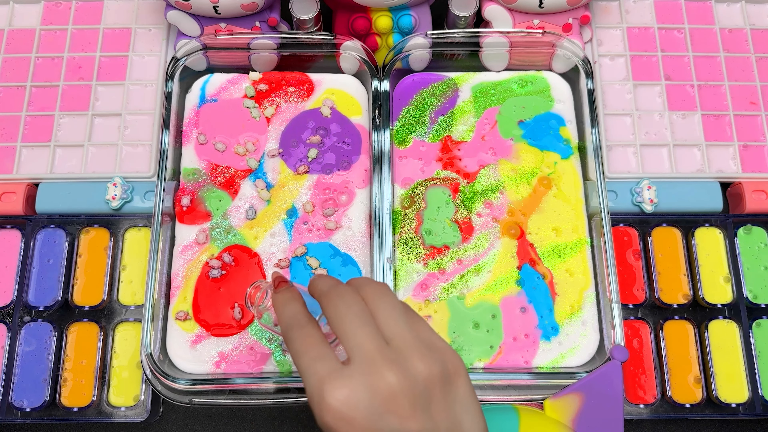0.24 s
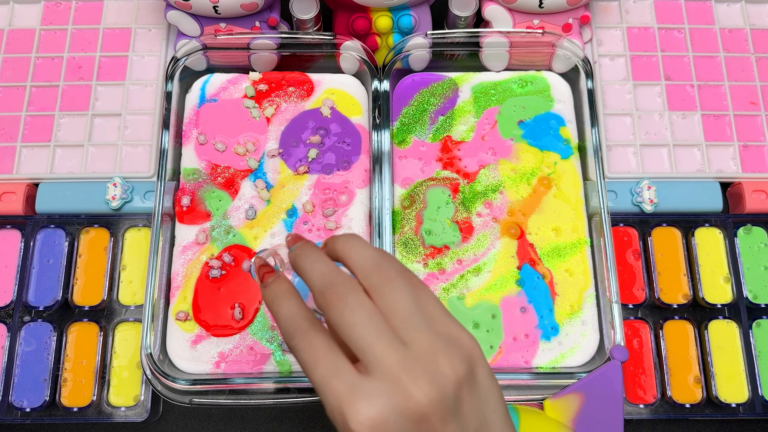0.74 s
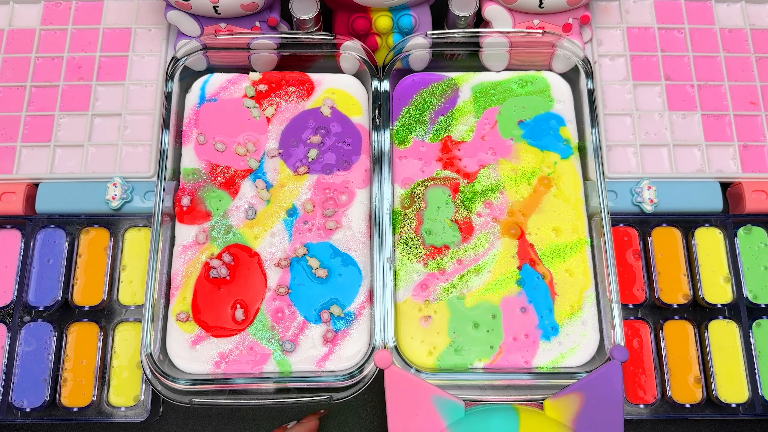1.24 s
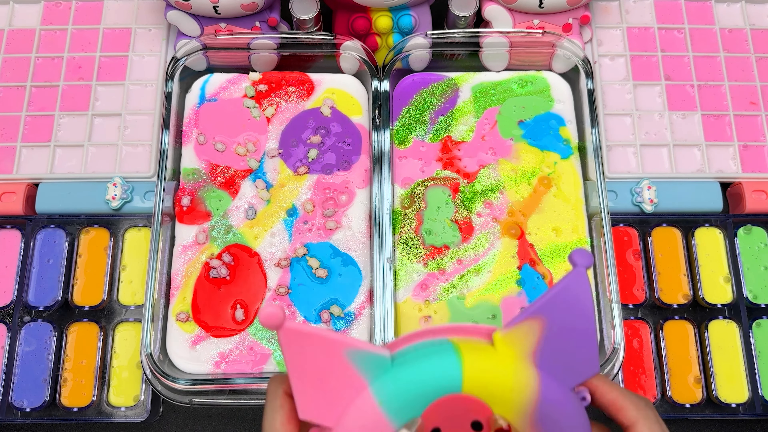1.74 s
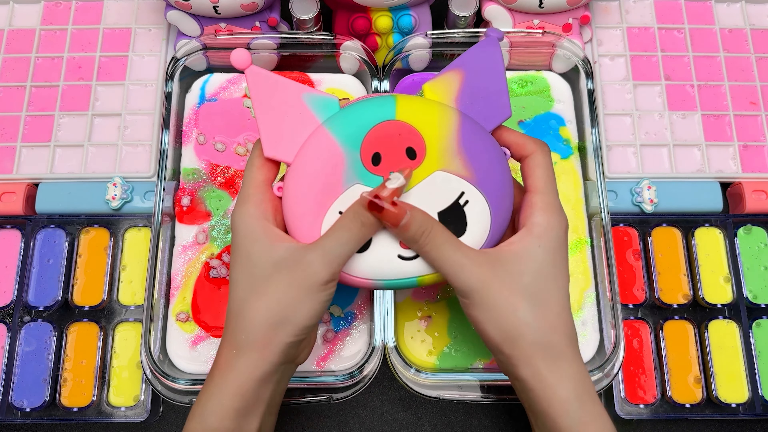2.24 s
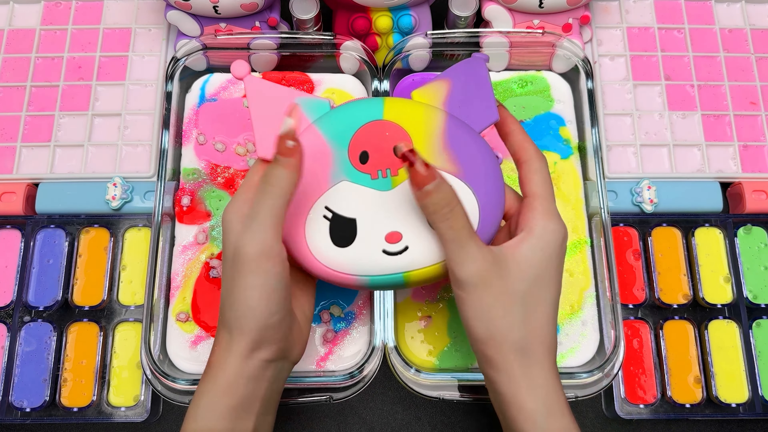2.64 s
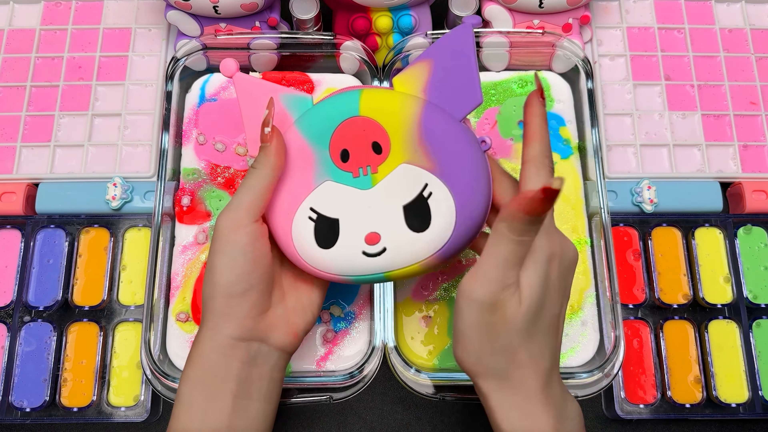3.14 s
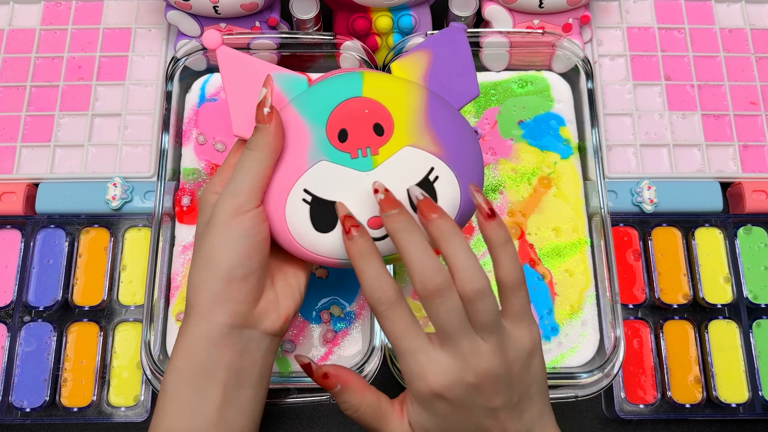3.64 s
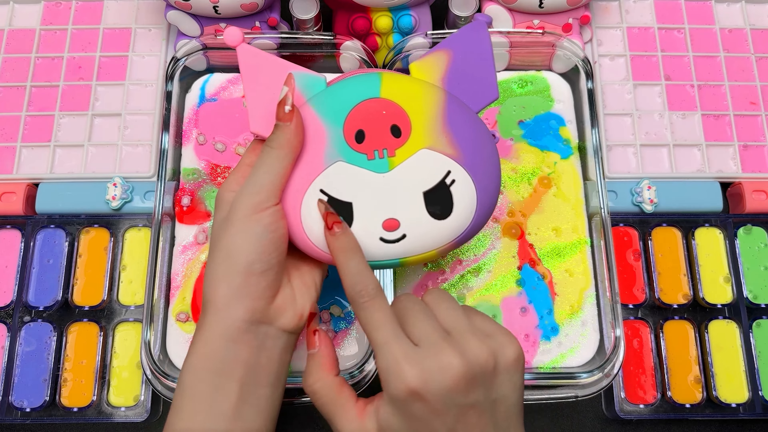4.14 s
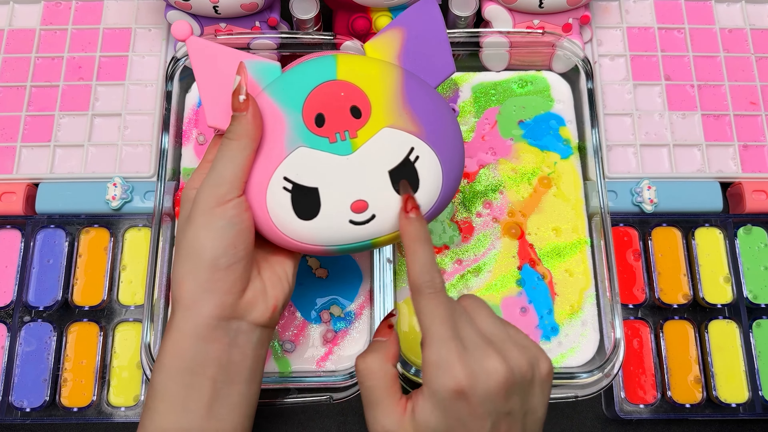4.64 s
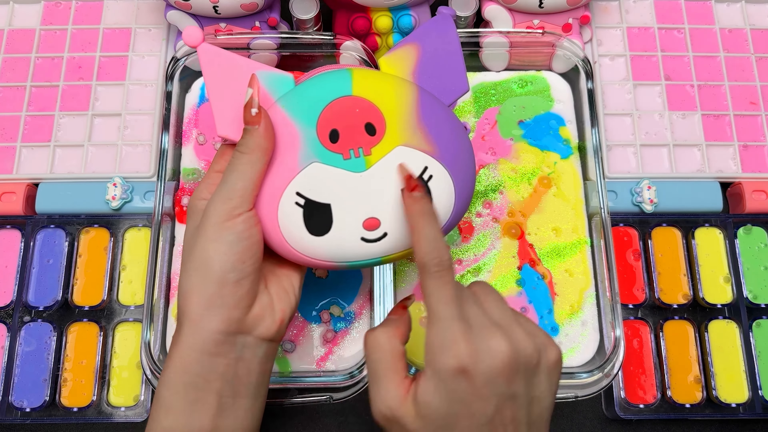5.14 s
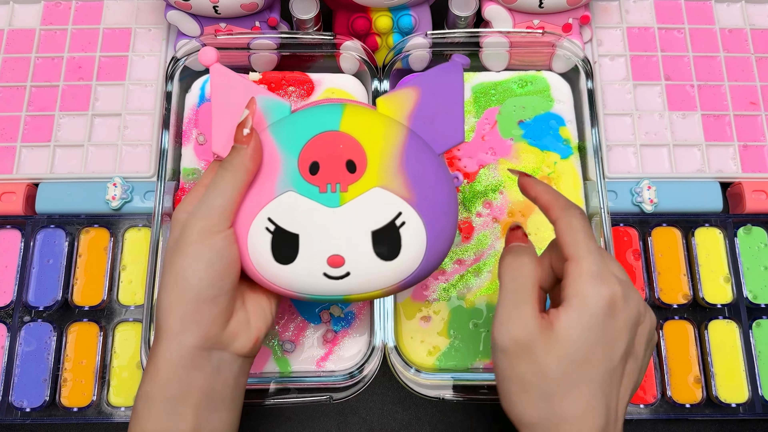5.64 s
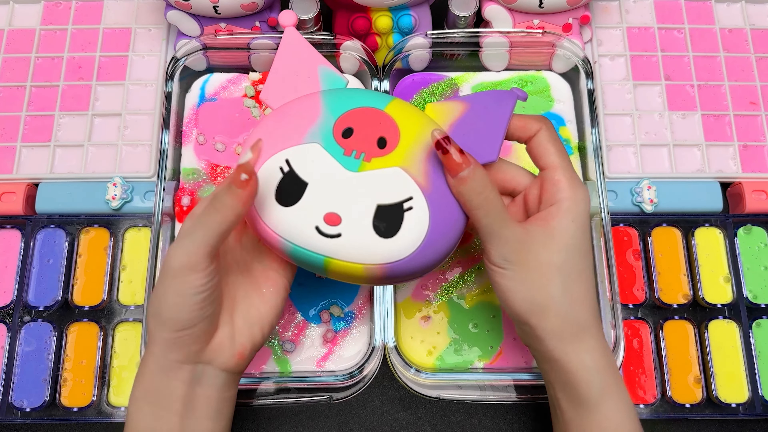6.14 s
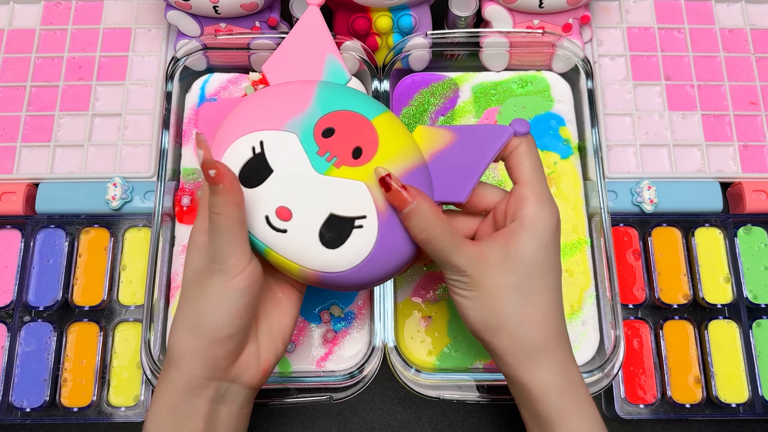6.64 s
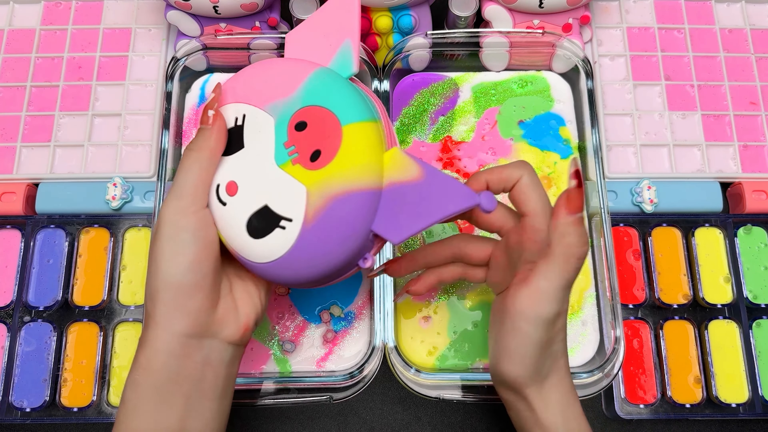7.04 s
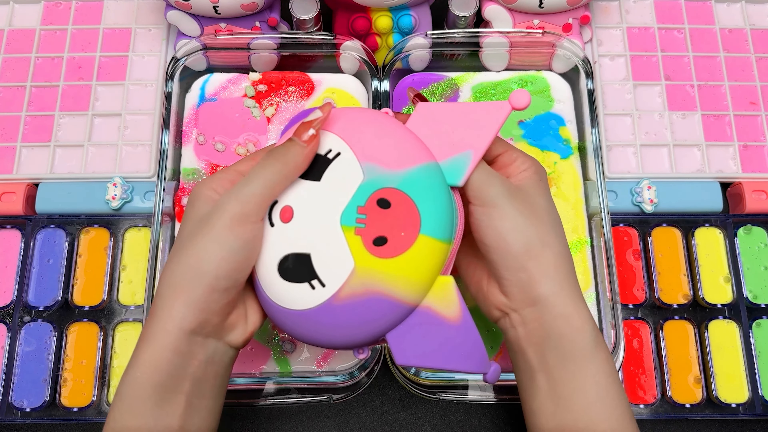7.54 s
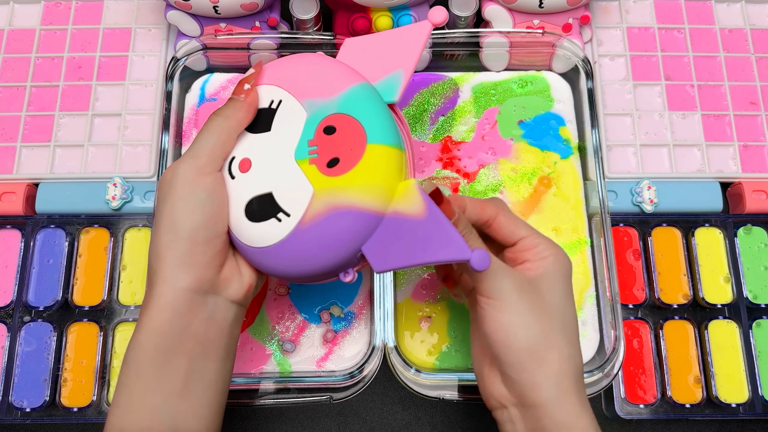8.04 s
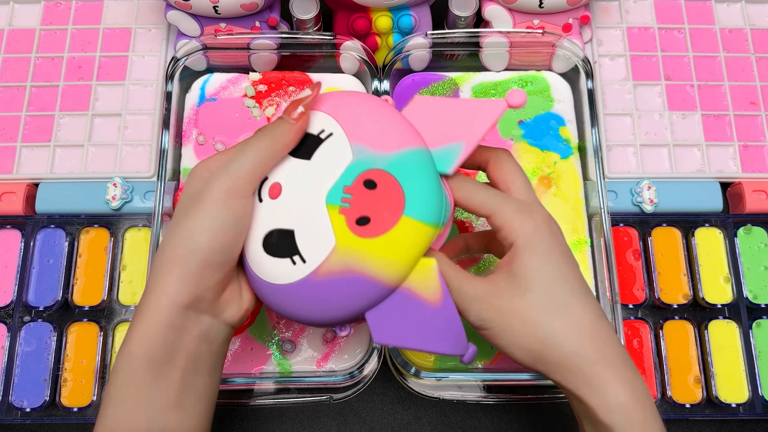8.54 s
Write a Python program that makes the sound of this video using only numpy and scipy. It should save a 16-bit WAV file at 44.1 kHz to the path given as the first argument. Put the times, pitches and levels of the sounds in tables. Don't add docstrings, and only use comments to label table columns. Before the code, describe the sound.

Very close in a small quiet room, tiny beads clatter in a glass vial for half a second, then the vial lands on a tray. After a brief total silence, hands squeeze, drum and poke a hollow silicone purse: soft pops, slaps, dry rubbing. Three rubbery stick-slip squeaks follow, then clicks, a short rasping zip, a tiny metal jingle and more handling.

```python
import sys
import numpy as np
from scipy import signal
from scipy.fft import rfft, irfft
from scipy.io import wavfile
from scipy.ndimage import uniform_filter1d

SR = 44100
rng = np.random.default_rng(int(sys.argv[2]) if len(sys.argv) > 2 else 0)


def materialize(psi):
    bounded = np.clip(np.atleast_2d(psi).T, -1, 1)
    quanta = np.round(bounded * 32767).astype(np.int16)
    wavfile.write(sys.argv[1], SR, quanta)


def nominal_scale(level):
    x = np.asarray(level, float) / 20
    return 10 ** x


N = 387638
T = np.arange(N) / SR

CUT = (1.298, 1.826)
# frequency in Hz, level in dB per Hz.
ROOM = [(18, -59), (30, -19.5), (70, -9), (95, -25.5), (204, -12), (666, -26), (9460, -34.5),
        (16000, -26.5)]
ROOM_DB = [-65.5, -59]
# frequency in Hz, level in dB.
HUM = [(199.2, -80), (9415, -88)]
# start in seconds, fade in seconds, level in dB, centre in Hz, width in Hz.
GRAZES = [(.002, 0.035, -54, 4400, 2020), (.815, 0.043, -34.5, 1310, 130), (.82, 0.036, -44.5, 2200, 500),
          (0.818, .035, -33.5, 5140, 2500), (1.831, .1, -54, 1720, 305), (2.87, .06, -41, 3540, 900),
          (2.97, 0.036, -44.5, 11100, 1800), (3.099, 0.01, -41, 2500, 1200),
          (5.669, 0.031, -55, 2300, 1200), (7.28, .045, -43, 1520, 1620), (7.29, .045, -44, 5070, 3000),
          (2.62, .012, -33.5, 1182, 900), (7.512, .02, -56, 3630, 500), (7.555, 0.021, -46.5, 1800, 700),
          (7.92, 0.043, -17, 1427, 200), (8.001, 0.025, -28, 2970, 300), (8.42, 0.026, -27.5, 2290, 302),
          (8.481, 0.057, -31, 3280, 2200)]
# time in seconds, body level in dB, latch level in dB.
SNAPS = [
    (7.277, -25.5, -37),
    (7.283, -30, -40),
    (7.2881, -15, -30.5),
    (7.2951, -20.5, -22.5),
    (7.3123, -17, -20.5),
    (7.317, -24.5, -28),
    (7.328, -20.5, -19),
]
# mode in Hz, width in Hz, level in dB.
SLIDER = [(1390, 280, 0), (1800, 230, 2.5), (3380, 170, -1), (3795, 50, -10), (4830, 300, -6)]
# mode in Hz, width in Hz, level in dB.
LATCH = [(6220, 200, -2.5), (7000, 570, -1), (9870, 400, -4.5), (12030, 640, 1.5)]

# time in seconds, blow in dB, wall ring in dB re blow.
CLUSTERS = [(0.057, -34, 2), (0.078, -24, -16.5), (0.0907, -21, -11), (0.113, -8.5, -18.5),
            (0.1213, -17.5, 0.5), (0.129, -3.5, -27), (0.1355, -0.5, -11), (0.142, 0.5, -1.5),
            (0.153, -7.5, -24), (0.218, -2, -2.5), (0.227, 1, -14.5), (0.2493, 0, -10.5), (0.2569, 8, -16),
            (0.2732, -1, 1), (0.2836, 2.5, -4.5), (0.2935, -10, -10.5), (0.3558, -15.5, -5),
            (0.38, -6.5, -11), (0.39, 4.5, -5.5), (0.406, -7, -16.5), (0.4206, 0, -23.5), (0.4802, -1, -6),
            (0.5331, 2, 0), (0.5542, -2.5, -0.5), (0.5831, -11, -20), (0.607, -12, -10),
            (0.635, -17, -23.5)]
# mode in Hz, width in Hz, level in dB.
CLACK = [(11330, 230, -1.5), (10340, 960, -6.5), (8700, 500, -14.5)]
# mode in Hz, width in Hz, level in dB.
WALL = [(14430, 100, 0), (14080, 150, -4), (12600, 200, -16)]
# mode in Hz, width in Hz, level in dB.
RATTLE = [(2330, 360, -7.5), (4120, 110, -4), (4540, 600, 6.5), (5500, 300, -4), (3280, 660, 1),
          (7700, 40, -17.5)]
RATTLE_DB, RATTLE_GROWTH = -17, .7
# time in seconds, level in dB, pitch in Hz.
BREATHS = [
    (.132, -30.5, 789),
    (.228, -29, 850),
    (.252, -25.5, 800),
    (.288, -36.5, 847),
    (.392, -27.5, 809),
    (.536, -26, 828),
    (.555, -26.5, 833),
]
AIR_CYCLES, AIR_SWELL = 9, 3.
# mode in Hz, width in Hz, level in dB.
AIR = [(842, 70, 0)]
AIR_DB = -58
# time in seconds, blow in dB.
SET_DOWN = [
    (0.804, -1),
    (0.804, -4.5),
    (0.8121, -0.5),
]
# mode in Hz, width in Hz, level in dB.
TRAY = [(1300, 41, -20.5), (1395, 60, -24), (1890, 370, -9), (2780, 790, -8), (4600, 140, -13.5),
        (6100, 3600, 13.5), (11100, 3500, 3.5)]

# mode in Hz, width in Hz, level in dB.
HOLLOW = [(298, 48, 1.5), (434, 75, 9.5), (516.3, 54.5, 7.5), (598, 77, 14), (685, 47, -10.5)]
# mode in Hz, width in Hz, level in dB.
SKIN = [(840, 630, -1.5), (1408, 470, 4.5), (1707, 92, -8), (2200, 440, 3.5)]
# mode in Hz, width in Hz, level in dB.
RASP = [(3330, 1800, 1.5), (3640, 1200, -3.5), (4180, 1000, 2), (5230, 730, -7)]
# mode in Hz, width in Hz, level in dB.
RUB = [(2400, 490, -2), (3000, 440, 4.5)]
# mode in Hz, width in Hz, level in dB.
HISS = [(7650, 6900, -2), (10700, 2600, -1.5), (14500, 3000, -12.5)]
# start in seconds, length in seconds, pressure in dB, dryness in dB.
SLIDES = [(1.812, 0.2, -62, -2.5), (2.216, 0.11, -32.5, 1.5), (2.336, .11, -46, 5),
          (2.449, 0.11, -40.5, -10.5), (2.737, .11, -36, 0), (2.821, 0.14, -57, 14),
          (2.957, 0.081, -39, -9), (3.077, 0.13, -43.5, -22), (3.332, 0.062, -32.5, -15.5),
          (3.428, 0.093, -39, -8.5), (5.377, 0.11, -39.5, 0.5), (5.665, 0.049, -35.5, -31.5),
          (5.775, 0.13, -33.5, -9.5)]
# start in seconds, length in seconds, pressure in dB, dryness in dB.
STROKES = [
    (4.123, 0.11, -45, -15.5),
    (4.257, 0.083, -33, -15.5),
    (4.471, 0.11, -49, -29),
    (4.599, 0.051, -34.5, -10),
    (4.781, 0.028, -28, -36),
    (4.863, 0.14, -38, -16.5),
    (5.04, 0.087, -34, -23),
    (5.238, 0.062, -44.5, -5.5),
]
# start in seconds, length in seconds, pressure in dB, dryness in dB.
KNEADS = [(6.097, 0.064, -36, -12), (6.17, 0.056, -37, -15), (6.503, 0.17, -38.5, -7.5),
          (7.03, 0.059, -48.5, -50), (7.546, 0.053, -28.5, -62), (8.164, 0.096, -38, -7),
          (8.253, 0.097, -38, -1), (8.36, 0.072, -44.5, -4), (8.411, 0.093, -32, -16.5),
          (8.487, 0.106, -27, -11), (8.646, 0.1, -35, -20.5)]
# skin in dB, hiss in dB.
FINISH = [
    (0, -2.5),
    (7, -5),
    (2, -29.5),
]
SKIN_PER_DRYNESS = 0.5
RUB_DB, RUB_PER_DRYNESS = 1.5, 0.98

# time in seconds, slap in dB, hollow pop and nail in
# dB re slap.
TAPS = [(2.185, -16.5, -4, -50.5), (2.213, -32.5, 14.5, 21), (2.273, 2, -1, -18),
        (2.302, -25.5, 16, -13), (2.378, 1.5, -0.5, -10.5), (2.497, -20, 8, -11.5),
        (2.736, -13.5, -7, 11.5), (2.758, -21.5, -34, 5.5), (2.767, -26.5, 14.5, -8.5),
        (2.817, -10.5, -6.5, -25), (2.966, -23.5, 14, -4), (3.022, -19, 8.5, -43), (3.104, -13, 4, -59),
        (3.17, -35.5, 11.5, -26), (3.339, 2.5, 5, -22), (3.444, -12, 15, -0.5), (3.507, -2.5, 5.5, -48),
        (3.591, -2, 2.5, -29), (3.653, -2, 10.5, -43), (3.749, -33, 17, -56),
        (4.049, -32.5, 10, -66), (4.199, -5, -2.5, -82), (4.261, -1, -3.5, -41), (4.281, -10.5, 15.5, -7),
         (4.337, -16.5, 14.5, -32), (4.512, -31.5, 19.5, -72), (4.607, -5.5, -10, -44), (4.614, -18, 6, 12),
         (4.678, -3, -12, -42), (4.69, -13, 8, -16), (4.86, -16.5, -4, -28), (4.89, -7, -7, -23),
         (4.954, -19, 10, -37), (5.039, -26.5, 16.5, -67.5), (5.105, -8, 2.5, -83),
         (5.277, -39.5, -18, 11.5), (5.42, -20, -4, -33), (5.455, -7, 7.5, -12.5),
        (5.681, -29, 17.5, -14), (5.774, -18, 22, 16), (5.806, -24.5, 13.5, 11.5), (5.837, -13, -6, -12.5),
         (5.854, -15.5, 3, -9), (6.104, -23, 8, -34), (6.175, -15.5, 4.5, -34), (6.265, -12, 3.5, -16.5),
         (6.513, -8, 11, -3), (6.748, -8, 9, -4), (6.771, -2.5, 12, -12), (8.198, -14.5, -33, -23),
         (8.233, -20, -31, -21), (8.283, -16, -47, -14), (8.568, -12, 2.5, -29.5), (8.681, -19, -5, -16.5)]
# time in seconds, level in dB.
THUMPS = [(2.256, -25.5), (2.369, -22), (2.486, -26.5), (2.75, -14), (2.8, -19), (2.968, -18),
          (3.333, -11.5), (3.433, -11.5), (3.503, -13.5), (3.582, -15.5), (3.649, -17.5), (3.745, -17),
          (5.375, -29), (5.44, -23), (5.672, -18), (5.762, -14.5), (6.093, -27.5), (6.541, -20.5),
          (6.828, -24.5), (8.476, -25), (8.549, -24.5)]
# mode in Hz, width in Hz, level in dB.
THUD = [(66, 170, -4.5), (120, 40, 3.5), (169, 26, 17.5), (209, 12, 9.5)]
# mode in Hz, width in Hz, level in dB.
NAIL = [(9170, 3200, 18), (11340, 360, 9.5), (14500, 4200, -17)]
# time in seconds,
# level in dB, pitch in Hz.
POPS = [(2.219, -14.5, 348), (2.272, -17, 443), (2.378, -10.5, 584), (2.816, -15.5, 306),
        (3.104, -12.5, 308), (3.346, -5.5, 296), (3.443, 3, 374), (3.507, -17.5, 510), (3.526, -4, 562),
        (3.591, -8, 370), (3.651, -7.5, 315), (3.663, -12, 527), (3.669, -12.5, 251), (4.2, -8, 507),
        (4.26, -2, 630), (4.28, 1, 552), (4.337, -9, 592), (4.511, -14.5, 455), (4.609, -10.5, 640),
        (4.64, -10, 494), (4.679, -2.5, 421), (4.856, -15, 332), (4.96, -14.5, 600), (5.039, -11, 327),
        (5.105, -12.5, 603), (5.306, -17.5, 583), (5.417, -9, 317), (5.455, -1, 425), (5.462, -5.5, 304),
        (5.474, -13, 348), (5.678, -10.5, 465), (5.764, -15, 424), (5.775, -6, 416), (5.784, -16, 280),
        (5.836, -16, 660), (5.863, -13, 580),
        (6.177, -6, 738), (6.265, -9.5, 496), (6.513, -7, 416), (6.529, -7, 590), (6.748, -10, 440),
             (6.757, -10, 454), (6.771, -2, 433), (6.812, -6, 475), (6.825, 4, 613), (6.838, -6.5, 420),
             (7.317, -22, 385), (7.506, -37, 440), (7.554, -9.5, 400), (7.689, -21, 510), (8.181, -15, 660),
             (8.31, -12.5, 630), (8.332, -19.5, 246), (8.372, -17.5, 650), (8.425, -12.5, 610),
             (8.439, -12.5, 620), (8.464, -8.5, 570), (8.48, -14, 423), (8.487, -8, 414),
             (8.498, -5.5, 540), (8.509, -8, 587), (8.526, -12.5, 600), (8.545, -7, 640),
             (8.555, -8.5, 533), (8.567, -7, 462), (8.594, -14.5, 507), (8.609, -15, 570),
             (8.678, -10, 500), (8.694, -17, 538)]
# time in seconds, level in dB, pitch in Hz.
TICKS = [(2.378, -12, 2330), (3.1048, -13, 1040), (3.3417, 2, 1047), (3.4434, 4, 1000), (3.5074, -3, 1110),
         (3.5282, -6.5, 1510), (3.5926, -2, 1070), (3.6525, -5.5, 1100), (3.6695, -6, 1053),
         (4.2606, 0.5, 1340), (4.6754, -9.5, 1690), (4.8616, -12.5, 1226), (4.8929, -15.5, 1080),
         (5.0418, -14.5, 1310), (5.057, -19, 1216), (5.07, -14.5, 1200), (5.1063, -13.5, 1720),
         (5.244, -21, 1390), (5.4432, -18, 2410), (5.4546, -2, 2430), (5.7778, -11.5, 970),
         (5.8385, -8, 2200), (5.8544, -16, 2180), (6.1035, -14.5, 2730), (6.1743, -4.5, 3390),
         (8.184, -17, 3193), (8.1962, -10.5, 1620), (8.2655, -12, 1670), (8.2826, -4, 3060),
         (8.4394, -21, 2200), (8.4874, -11, 2140), (8.527, -9.5, 1830), (8.5482, -8, 2140),
         (8.5684, -12, 1840), (8.6784, -20, 1780)]
POP_CYCLES, POP_DB, TICK_CYCLES, TICK_DB = 2.83, -2.5, 2.8, -2
RASP_DB, RASP_PER_NAIL = 6, 0.53
DELAY_S = .0015

# start and length in seconds, first and last slips per second, level in dB.
CHIRPS = [
    (2.21, .06, 1030, 1450, -25),
    (2.793, .05, 790, 1020, -29),
]
# mode in Hz, width in Hz, level in dB.
GLIDE = [(1300, 470, -2), (2375, 1800, 7.5), (3700, 950, 0.5)]

# start and length in seconds, level in dB, upper ring in dB re lower.
TREMBLES = [(2.497, .13, -55.5, -22), (2.977, 0.044, -36, -4), (3.351, .05, -32.5, 1),
            (3.447, 0.025, -35, 2.5), (5.544, 0.07, -53.5, 3.5), (5.631, 0.11, -46, -19),
            (6.22, 0.03, -48, -0.5), (6.425, 0.03, -43.5, -19), (6.616, .02, -38, -9.5),
            (6.842, .025, -37, -1), (8.178, 0.035, -40.5, -21), (8.242, .05, -42, -14),
            (8.595, 0.016, -51, -15), (8.657, 0.05, -42.5, -24)]
# time in seconds, level in dB, pitch in Hz.
TINGS = [
    (5.558, -17.5, 10060),
    (6.217, -19, 5627),
    (6.217, -26, 10300),
    (2.512, -29, 13900),
    (2.58, -34, 14000),
    (2.58, -29.5, 5750),
    (8.598, -37, 5800),
]
# mode in Hz, width in Hz, level in dB.
PULL_LOW = [(5800, 300, 0), (5250, 500, 1)]
# mode in Hz, width in Hz, level in dB.
PULL_MID = [(10400, 540, -5.5), (11600, 620, 2.5)]
# mode in Hz, width in Hz, level in dB.
PULL_HIGH = [(13900, 70, 0), (12200, 70, -5), (13300, 70, -6)]

# grip and tear in seconds, slips per second at the grip and after a full rise in pace,
# tear level in dB.
DRAGS = [
    (6.274, 6.344, 320, 880, 0),
    (6.503, 6.57, 270, 880, -1),
    (6.782, 6.831, 335, 930, 1),
]
# share of the way to the tear, share of the rise in pace, hollow in dB,
# squeak in dB, unevenness from 0 to 1.
STRETCH = [
    (0, 0, -23.5, -45.5, .15),
    (.4, 0.2, -23, -22, .12),
    (0.751, 0.03, -9, -18, .08),
    (1, 0.82, -13.5, 2, 0.02),
    (1.171, .9, -11, -20.5, 0.3),
    (1.32, 0.33, -24, -45.5, 0.4),
]
# mode in Hz, width in Hz, level in dB.
SQUEAK = [(1110, 830, -6), (2500, 1100, -3), (3480, 360, -9.5), (3880, 130, -14), (5600, 3200, -12.5),
          (8640, 3000, -19)]

# time in seconds, teeth per second, pull in dB, bite in dB re pull.
ZIP = [
    (7.678, 236, -31.5, -23),
    (7.7, 252, -14.5, -19),
    (7.76, 335, -12.5, -12),
    (7.85, 272, -18, -8),
    (7.915, 330, -15.5, -6.5),
    (7.992, 290, -26, -2),
    (8.015, 515, -23, 3.5),
    (8.04, 680, -12.5, -16.5),
    (8.062, 322, -35, -31),
]
# mode in Hz, width in Hz, level in dB.
TAPE = [(305.96, 190, -4), (482, 260, 3.5), (623, 182, 3.5)]
# mode in Hz, width in Hz, level in dB.
TEETH = [(993, 430, -5.5), (1423, 73, -14), (1615, 63, -20), (2127, 360, -5.5)]
# time in seconds, low ring in dB, high ring in dB.
JINGLE = [
    (8.2556, -24.5, -34.5),
    (8.2812, -9, -21.5),
]

# start in seconds, length in seconds.
WIDE = [(.11, .07), (.38, .22), (2.37, .03), (4.67, .04), (4.91, .04), (5.43, .05), (5.78, .05),
        (6.81, .04)]
WIDE_DB = -10
SMEAR_DB, CEILING = -21, 0.59


def ring(modes, chance=0):
    hz, width, db = np.transpose(modes)[:, :, None]
    t = T[:int(SR * (.01 + 1.9 / width.min()))]
    swing = np.sin(2 * np.pi * (hz + .3 * width * chance) * t)
    y = np.sum(nominal_scale(db + 3 * chance) * np.exp(-np.pi * width * t) * swing, axis=0)
    limits = (.75 * hz.min(), min(1.25 * hz.max(), 17000))
    y = signal.sosfilt(signal.butter(3, limits, "band", fs=SR, output="sos"), y)
    return y / np.max(np.abs(y))


def strike(times, dbs, modes, contact_s, grit):
    out = np.zeros(N + SR)
    t = T[:SR // 25]
    chance = rng.standard_normal((len(times), len(t) + len(modes)))
    for s, db, c, contact in zip(times, dbs, chance, np.broadcast_to(contact_s, len(times))):
        push = t * np.exp(-t / contact) * (1 - grit + grit * c[:len(t)])
        y = signal.fftconvolve(push, ring(modes, c[len(t):, None]))
        i = int(s * SR)
        out[i:i + len(y)] += nominal_scale(db) * y / np.max(np.abs(y))
    return out[:N]


def pings(rows, cycles, db, swell=0.59):
    out = np.zeros(N + SR)
    t = T[:SR // 10]
    for s, top, hz in rows:
        rise = np.sin(np.pi / 2 * np.minimum(t * hz / swell, 1)) ** 2
        y = np.sin(2 * np.pi * hz * t) * np.exp(-t * hz / cycles) * rise
        i = int(s * SR)
        out[i:i + len(t)] += nominal_scale(top + db) * y
    return out[:N]


def unit(x):
    return x / np.sqrt(np.mean(x ** 2))


def through(x, modes):
    return unit(signal.fftconvolve(x, ring(modes))[:len(x)])


def treble(x, hz):
    return signal.sosfilt(signal.butter(3, hz, "high", fs=SR, output="sos"), x)


def crackle(count, spread_db):
    return rng.standard_normal(count) * nominal_scale(spread_db * rng.exponential(size=count))


def slips(rate, uneven, scatter_db):
    waver = unit(uniform_filter1d(rng.standard_normal(len(rate)), size=40))
    pace = rate * np.exp(uneven * waver)
    phase = np.cumsum(pace) / SR
    i = np.flatnonzero(np.diff(np.floor(phase)))
    late = phase[i + 1] % 1 * SR / pace[i + 1]
    size = nominal_scale(scatter_db * rng.standard_normal(len(rate)))[i]
    out = np.zeros(len(rate))
    out[i], out[i + 1] = size * late, size * (1 - late)
    return out


def span(rows):
    s, *columns = np.transpose(rows)
    where = slice(int(s[0] * SR), int(s[-1] * SR))
    return where, [np.interp(T[where], s, c) for c in columns]


def room_tone():
    hz, db = np.transpose(ROOM)
    colour = nominal_scale(np.interp(np.log(np.fft.rfftfreq(N, 1 / SR) + 1), np.log(hz), db))
    noise = unit(irfft(rfft(rng.standard_normal(N)) * colour, N))
    noise = noise * nominal_scale(np.where(T < CUT[1], *ROOM_DB))
    return noise + sum(nominal_scale(db + 6.5) * np.sin(2 * np.pi * f * T) for f, db in HUM)


def echo(t60_s, db):
    t = T[:SR // 2]
    tail = rng.standard_normal(len(t)) * 1000. ** (-t / t60_s) * (t > .003)
    return nominal_scale(db) / np.sqrt(SR) * unit(tail)


def grazes():
    out = np.zeros(N + SR)
    t = T[:SR // 4]
    for s, fade, db, hz, width in GRAZES:
        band = [(hz - width / 4, width / 2, 0), (hz + width / 4, width / 2, 0)]
        grains = through(through(crackle(len(t), 2.0), band), band)
        i = int(s * SR)
        out[i:i + len(t)] += nominal_scale(db) * grains * np.exp(-t / fade) * np.minimum(t / .004, 1)
    s, body, latch = np.transpose(SNAPS)
    snaps = strike(s, body, SLIDER, contact_s=0.0006, grit=0.33)
    return out[:N] + snaps + strike(s, latch, LATCH, contact_s=0.00098, grit=.8)


def vial():
    s, db, wall = np.transpose(CLUSTERS)
    beads = strike(s, db - 10.5, CLACK, contact_s=0.002, grit=0.95)
    beads += strike(s, db + wall, WALL, contact_s=0.00054, grit=0.9)
    beads += pings(BREATHS, AIR_CYCLES, 0, AIR_SWELL)
    beads += strike(s, RATTLE_GROWTH * db + RATTLE_DB, RATTLE, contact_s=0.0016, grit=1.0)
    tumble = np.abs(uniform_filter1d(np.abs(beads), size=400)) ** 0.66
    beads += nominal_scale(AIR_DB) * through(tumble * rng.standard_normal(N), AIR)
    return beads + strike(*np.transpose(SET_DOWN), TRAY, contact_s=0.0012, grit=0.98)


def rubbing():
    grains = crackle(N, 1.6)
    depth_db = np.array([[12.], [11.], [7.], [4.], [8.]])
    drift = unit(uniform_filter1d(rng.standard_normal((5, N)), size=500))
    fits = nominal_scale(depth_db * np.tanh(drift / 2))
    colours = (HOLLOW[1:], SKIN[:2], RASP, HISS, RUB)
    layers = np.array([through(grains * fit, modes) for fit, modes in zip(fits, colours)])
    layers[:2] = through(layers[0], HOLLOW[1:]), through(layers[1], SKIN[:3])
    out = np.zeros(N)
    for rows, (skin, hiss) in zip((SLIDES, STROKES, KNEADS), FINISH):
        for s, length, db, dry in rows:
            rub_db = db + skin + RUB_DB + RUB_PER_DRYNESS * dry
            dbs = db, db + skin + SKIN_PER_DRYNESS * dry, db + dry, db + dry + hiss, rub_db
            done = (T - s) / length
            where = (done > -.2) & (done < 1.5)
            swell_db = np.interp(done[where], (-.2, .1, .7, 1.5), (-30, 1, -1, -25))
            out[where] += nominal_scale(swell_db) * (nominal_scale(np.array(dbs)) @ layers[:, where])
    return out


def taps():
    s, db, hollow, nail = np.transpose(TAPS)
    body = strike(s, db + hollow - 4.5, HOLLOW, contact_s=0.00026, grit=0.77)
    body += strike(s + DELAY_S, db - 3.5, SKIN, contact_s=0.00072 * nominal_scale(-.3 * db), grit=1.0)
    rasp_db = db + RASP_DB + RASP_PER_NAIL * np.minimum(nail, 0)
    edge = strike(s + DELAY_S, rasp_db, RASP, contact_s=0.00059, grit=0.094)
    edge += strike(s + DELAY_S, db + nail, NAIL, contact_s=0.00058, grit=0.67)
    own = pings(POPS, POP_CYCLES, POP_DB) + pings(TICKS, TICK_CYCLES, TICK_DB)
    pressed, press_db = np.transpose(THUMPS)
    thuds = strike(pressed + .009, press_db, THUD, contact_s=.002, grit=.3)
    return own + treble(body, 275) + edge + thuds


def chirps():
    out = np.zeros(N)
    for s, length, first, last, db in CHIRPS:
        where, (rate,) = span([(s, first), (s + length, last)])
        squeak = through(slips(rate, .004, .5), GLIDE)
        out[where] += nominal_scale(db) * squeak * signal.windows.tukey(len(rate), .4)
    return out


def trembling():
    gate = np.zeros((2, N))
    for s, length, db, upper in TREMBLES:
        a, b = int(s * SR), int(length * SR)
        gate[:, a:a + b] += nominal_scale(np.array([[db], [db + upper]])) * signal.windows.tukey(b, .5)
    knocks = crackle(N, 3.0)
    low = through(through(knocks, PULL_LOW), PULL_LOW)
    rings = gate[0] * low + gate[1] * through(knocks, PULL_MID)
    return rings + pings(TINGS, 24, 0, swell=9.)


def drags():
    out = np.zeros(N)
    way, rise, hollow_db, squeak_db, rough = np.transpose(STRETCH)
    for grip, tear, slow, fast, db in DRAGS:
        rows = [grip + way * (tear - grip), slow + rise * (fast - slow), db + hollow_db, db + squeak_db, rough]
        where, (rate, hollow, squeak, uneven) = span(np.transpose(rows))
        pulses = slips(rate, np.clip(uneven, 0, 1), 20 * uneven)
        torn = unit(pulses) + .7 * unit(crackle(len(rate), 3.0))
        sound = nominal_scale(hollow) * through(through(pulses, HOLLOW), HOLLOW[:4])
        sound += nominal_scale(squeak) * through(torn, SQUEAK[:4])
        sound += nominal_scale(2 * squeak - 4.0) * through(pulses, SQUEAK[4:])
        out[where] += sound * signal.windows.tukey(len(rate), .15)
    return out


def zip_fastener():
    out = np.zeros(N)
    where, (rate, hollow, bite) = span(ZIP)
    teeth, rasp = hollow + 1.08 * bite + 2.0, hollow + bite - .8
    scrape = unit(crackle(len(rate), 4.2))
    pulses = unit(slips(rate, 0.072, 4.1))
    sound = nominal_scale(hollow) * through(through(pulses + 0.97 * scrape, TAPE), TAPE)
    sound += nominal_scale(teeth) * through(pulses + 1.1 * scrape, TEETH)
    sound += nominal_scale(rasp) * through(pulses + 3.3 * scrape, RASP)
    sound += nominal_scale(1.66 * rasp) * through(scrape, HISS)
    out[where] = .33 * np.tanh(sound / .33)
    s, low, high = np.transpose(JINGLE)
    rustle = strike(s - .002, low - 4, PULL_LOW, contact_s=0.0034, grit=0.85)
    return out + trembling() + rustle + strike(s, high, PULL_HIGH, contact_s=0.0026, grit=0.96)


def scene():
    dry = vial() + taps() + rubbing() + zip_fastener()
    near = 0.81 * np.tanh(drags() / 0.76) + chirps()
    dry = dry + .5 * near
    bright = treble(dry, 3900)
    wet = signal.fftconvolve(dry - bright, echo(0.2, -11.5))[:N]
    wet += signal.fftconvolve(bright, echo(0.055, -8.5))[:N]
    mono = dry + .5 * near + wet + room_tone() + grazes()
    mono = mono * ((T < CUT[0]) | (T > CUT[1]))
    return np.array([mono, mono])


def low_pass(x):
    return signal.sosfilt(signal.butter(12, 16800, fs=SR, output="sos"), x)


def record(dry):
    mid = treble(dry[0], 48)
    mid = mid / (1 + (mid / CEILING) ** 4) ** 0.22
    spread = uniform_filter1d(uniform_filter1d(treble(mid, 3000) ** 2, size=900), size=900)
    mid = mid + nominal_scale(SMEAR_DB) * np.sqrt(np.abs(spread)) * unit(treble(rng.standard_normal(N), 2500))
    mid = signal.sosfilt(signal.ellip(6, .2, 60, 15750, fs=SR, output="sos"), mid)
    share = nominal_scale(WIDE_DB) * sum((T > s) & (T < s + length) for s, length in WIDE)
    envelope = np.sqrt(np.abs(uniform_filter1d(treble(mid, 5000) ** 2, size=200)))
    side = share * envelope * unit(treble(rng.standard_normal(N), 6000))
    return low_pass(np.array([mid + side, mid - side]))


dry = scene()
out = record(dry)
materialize(out)
```